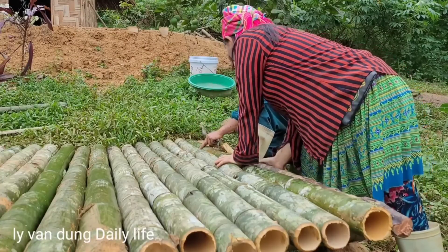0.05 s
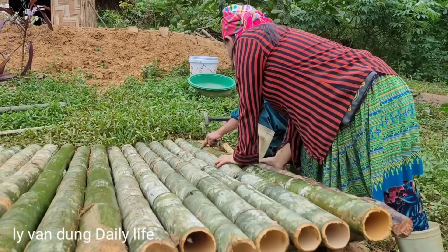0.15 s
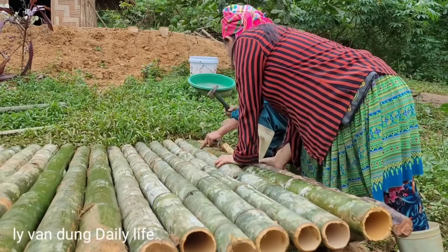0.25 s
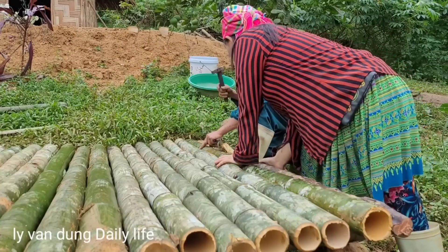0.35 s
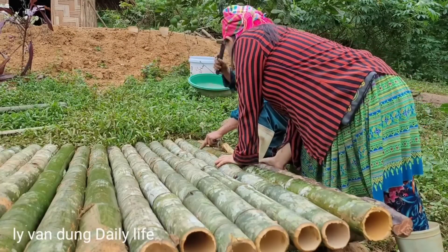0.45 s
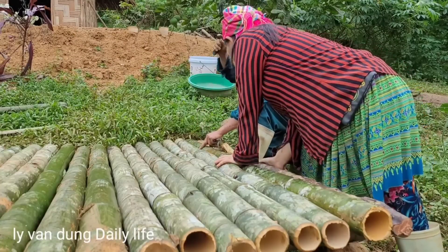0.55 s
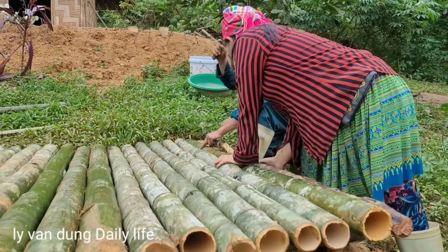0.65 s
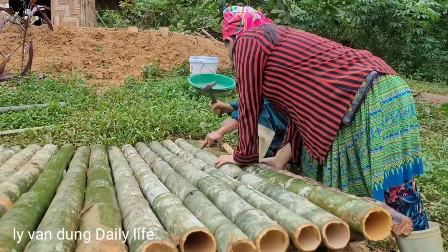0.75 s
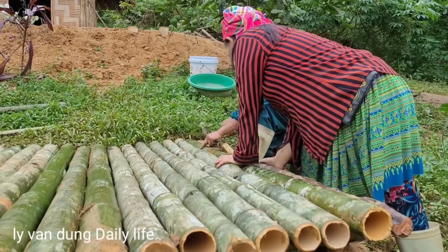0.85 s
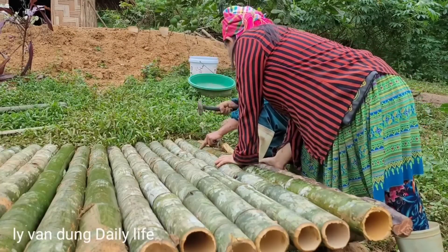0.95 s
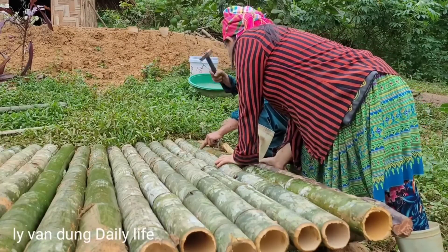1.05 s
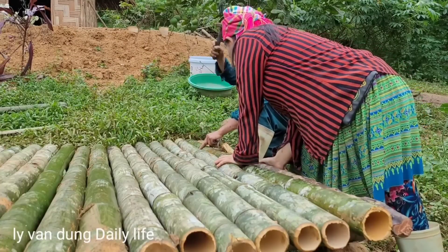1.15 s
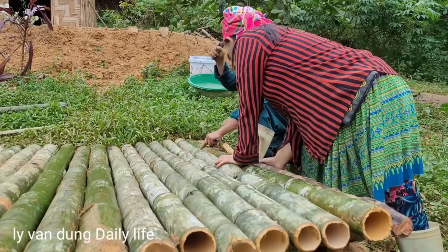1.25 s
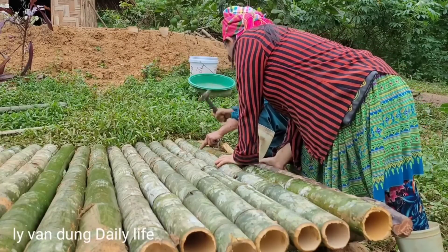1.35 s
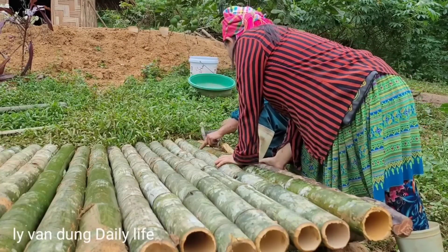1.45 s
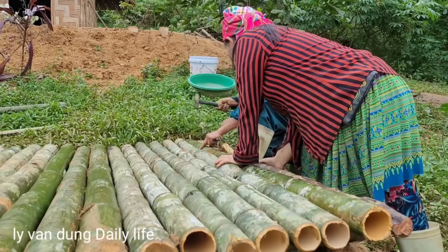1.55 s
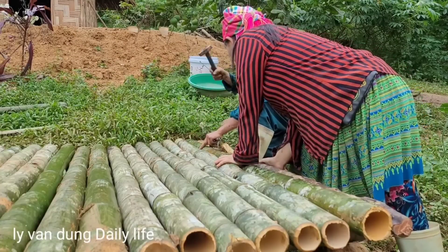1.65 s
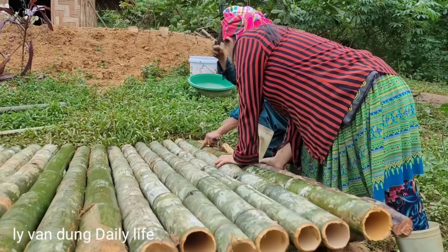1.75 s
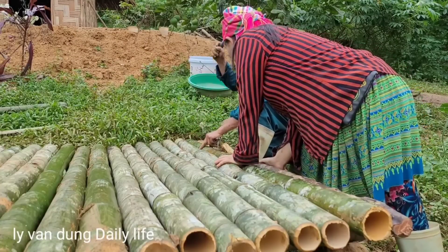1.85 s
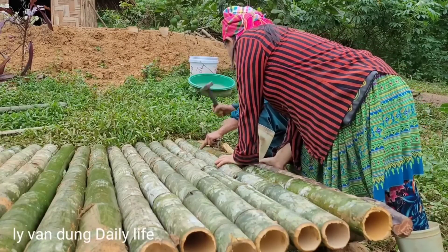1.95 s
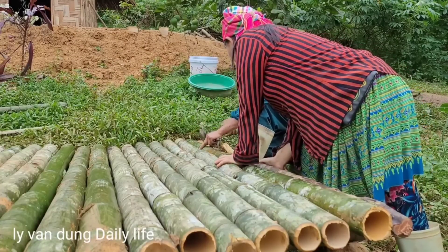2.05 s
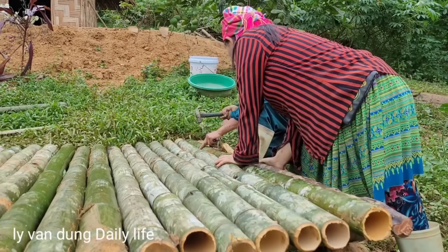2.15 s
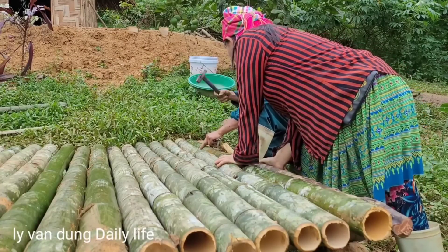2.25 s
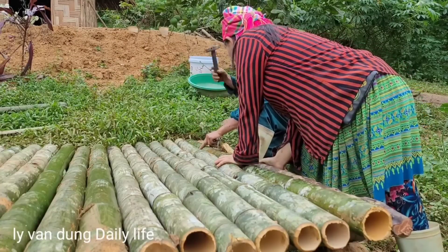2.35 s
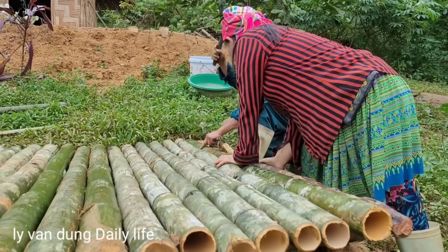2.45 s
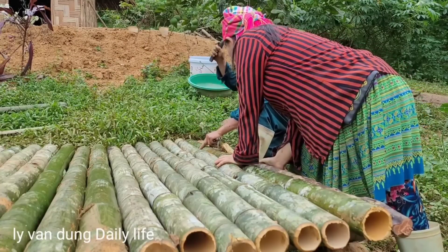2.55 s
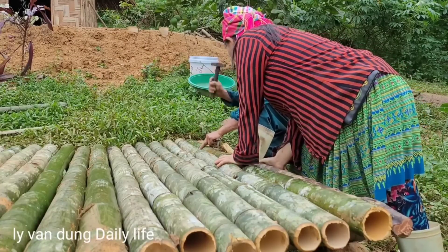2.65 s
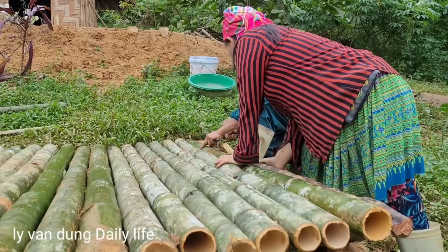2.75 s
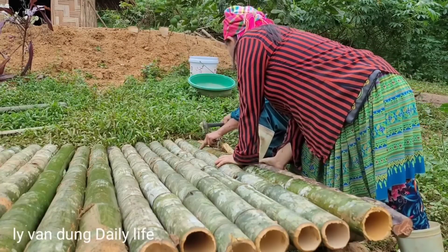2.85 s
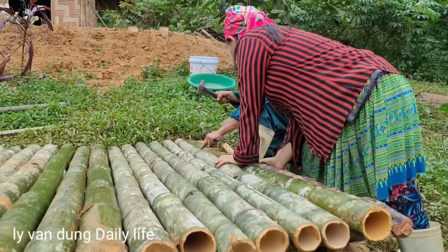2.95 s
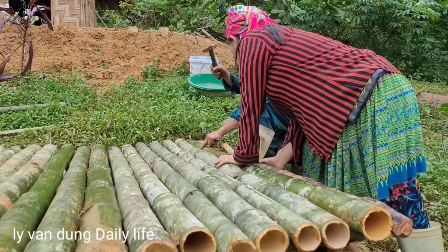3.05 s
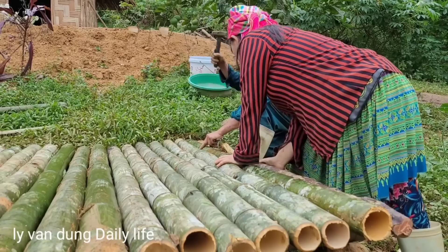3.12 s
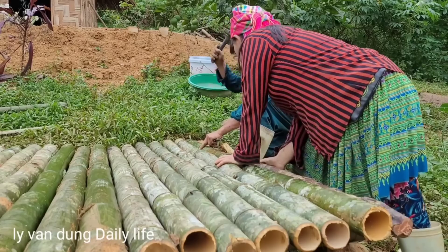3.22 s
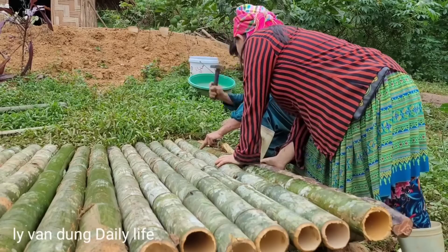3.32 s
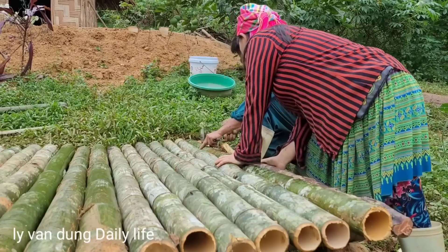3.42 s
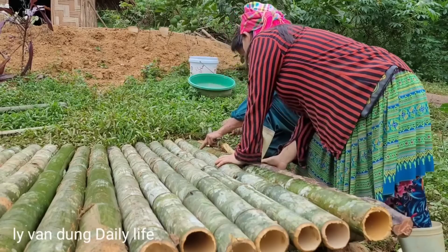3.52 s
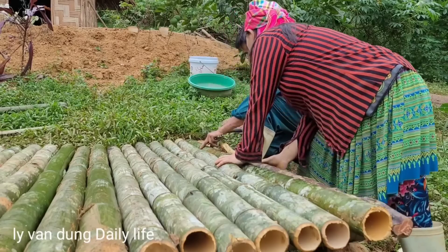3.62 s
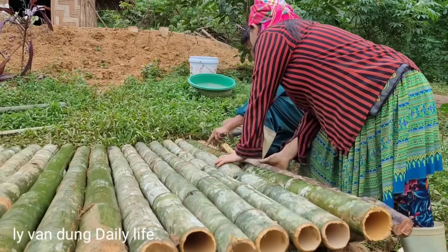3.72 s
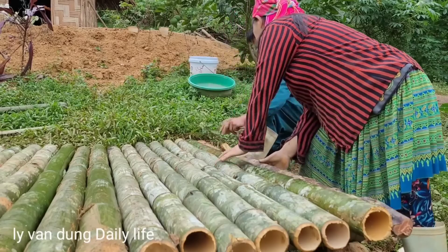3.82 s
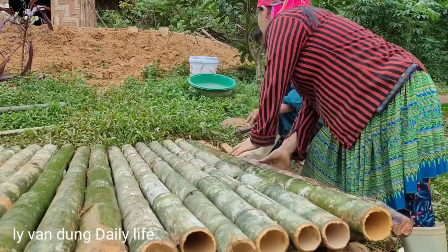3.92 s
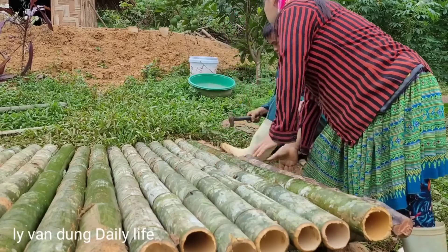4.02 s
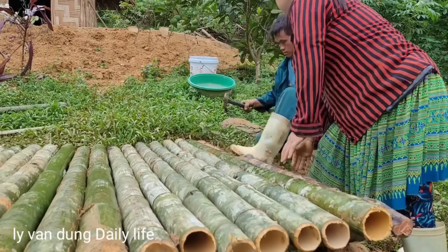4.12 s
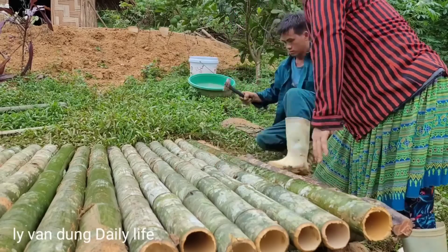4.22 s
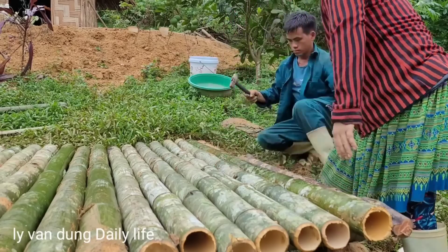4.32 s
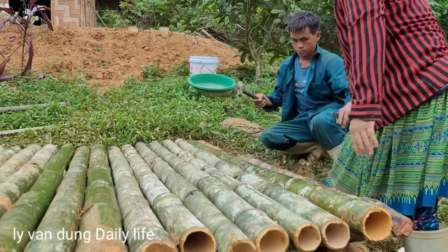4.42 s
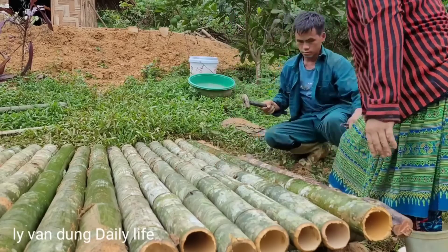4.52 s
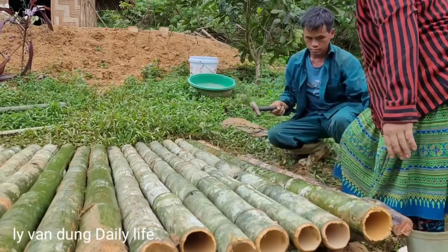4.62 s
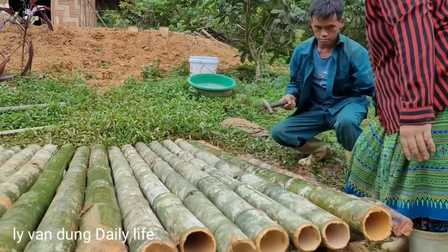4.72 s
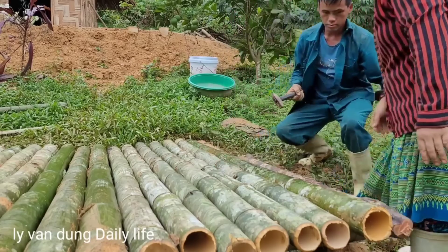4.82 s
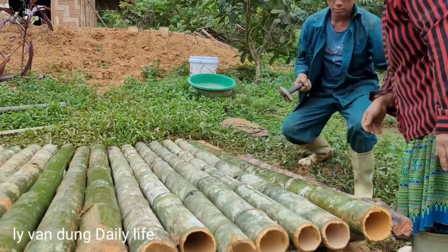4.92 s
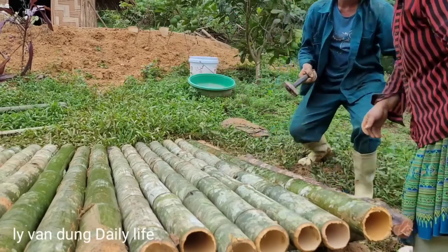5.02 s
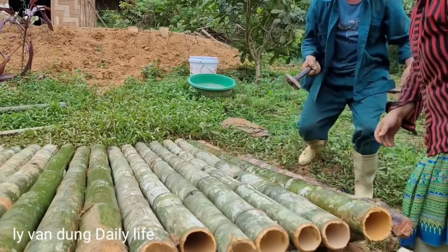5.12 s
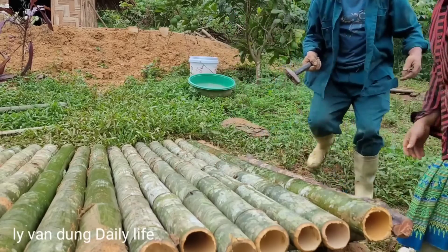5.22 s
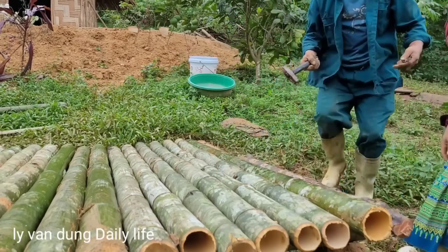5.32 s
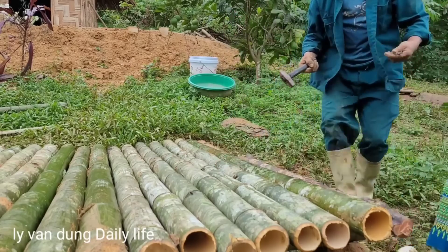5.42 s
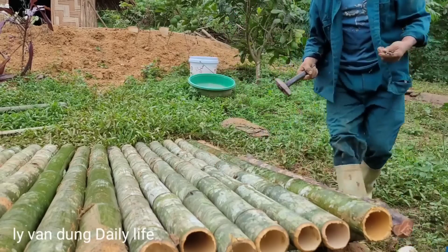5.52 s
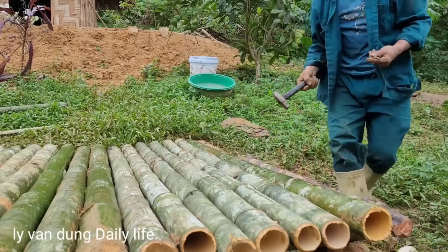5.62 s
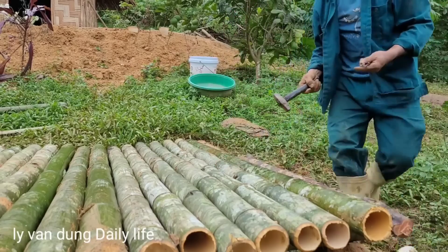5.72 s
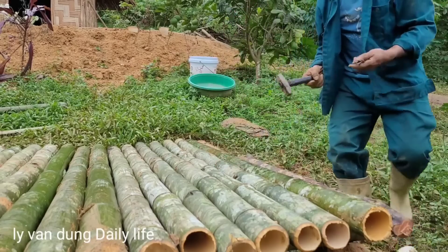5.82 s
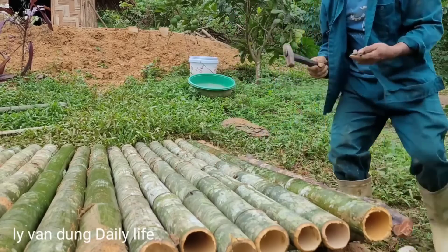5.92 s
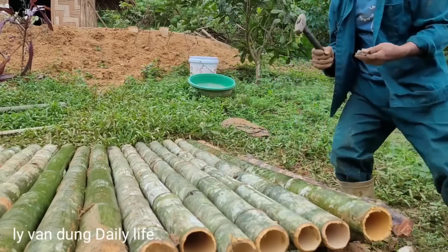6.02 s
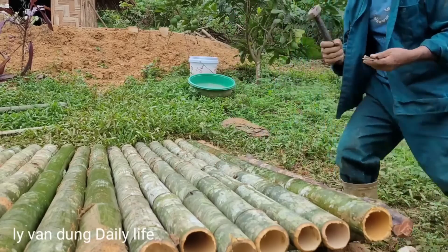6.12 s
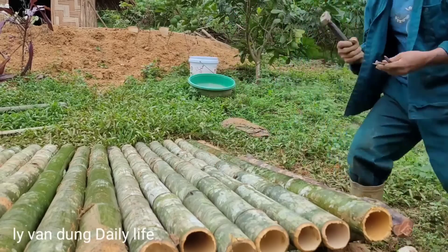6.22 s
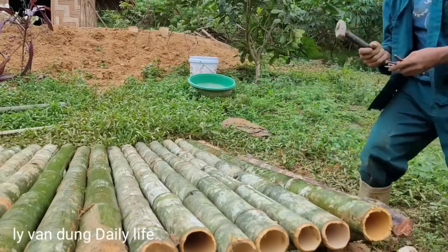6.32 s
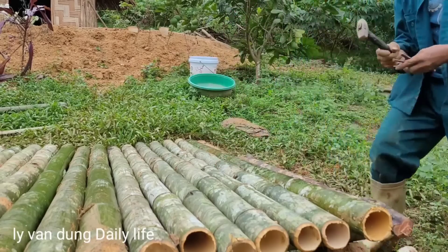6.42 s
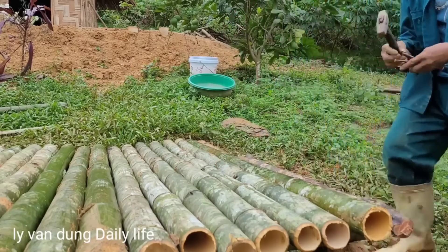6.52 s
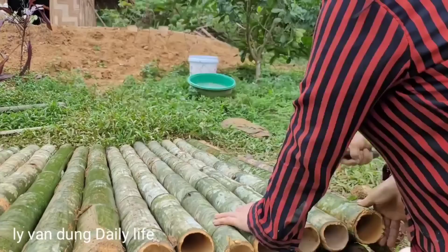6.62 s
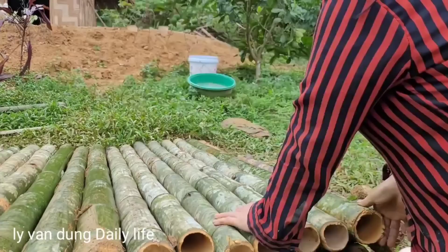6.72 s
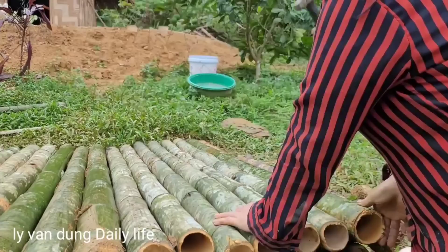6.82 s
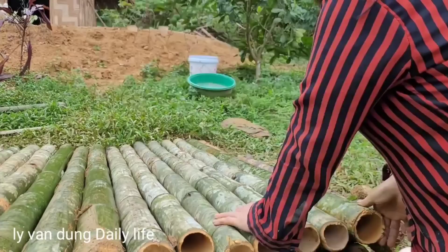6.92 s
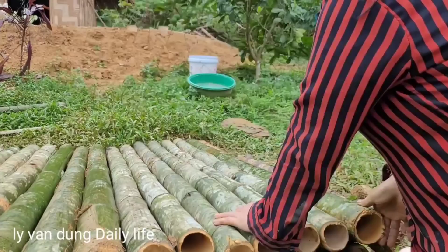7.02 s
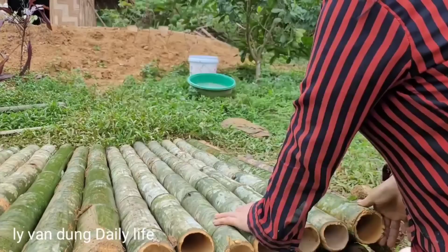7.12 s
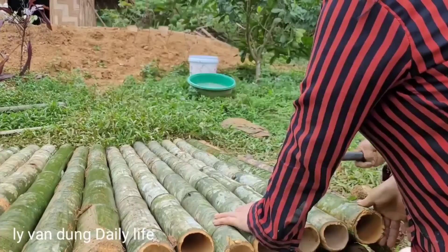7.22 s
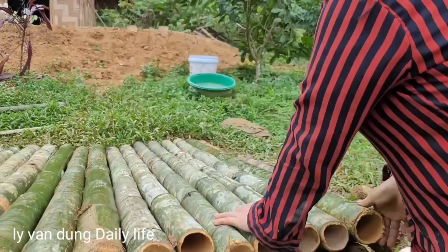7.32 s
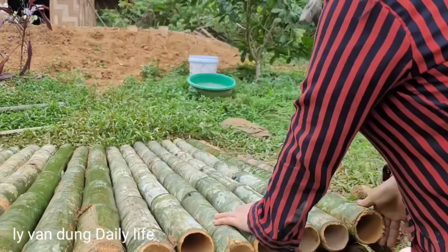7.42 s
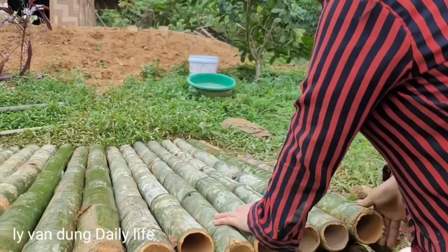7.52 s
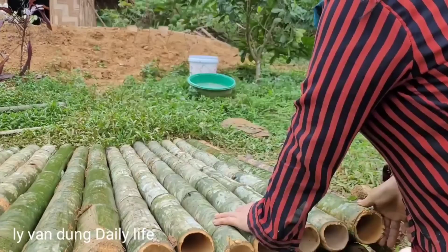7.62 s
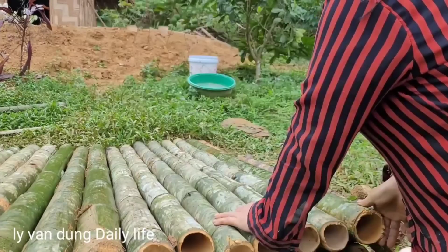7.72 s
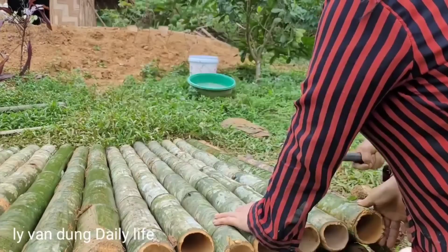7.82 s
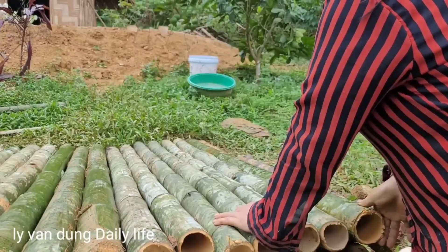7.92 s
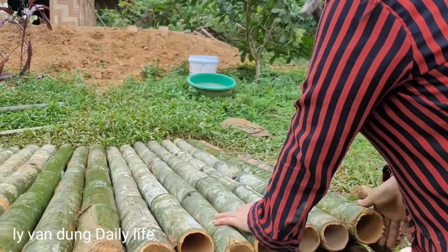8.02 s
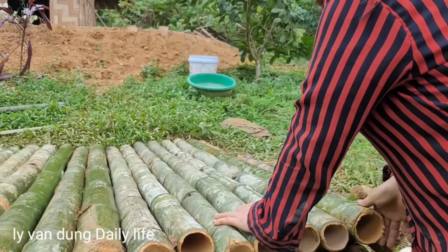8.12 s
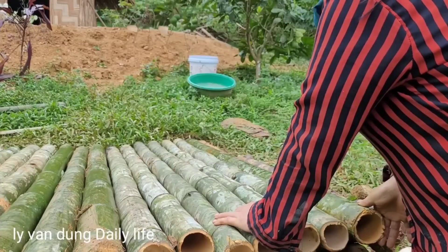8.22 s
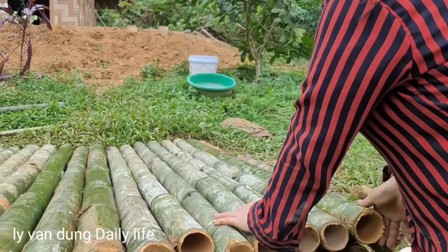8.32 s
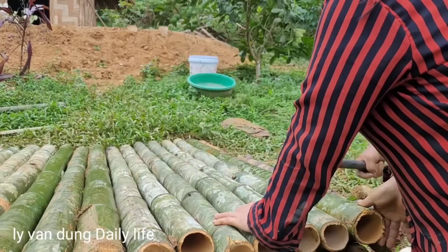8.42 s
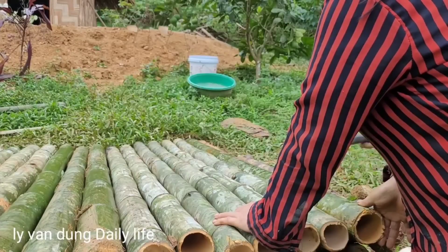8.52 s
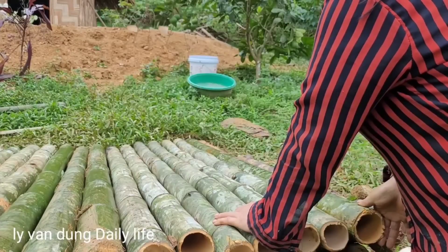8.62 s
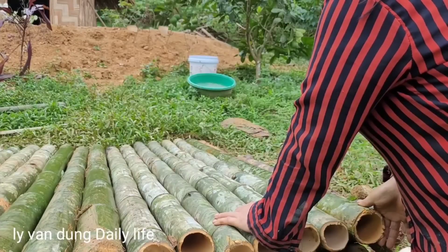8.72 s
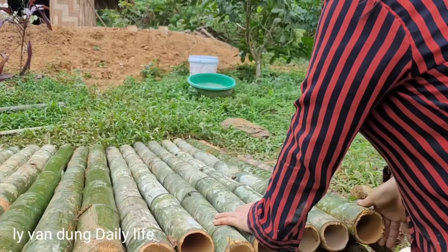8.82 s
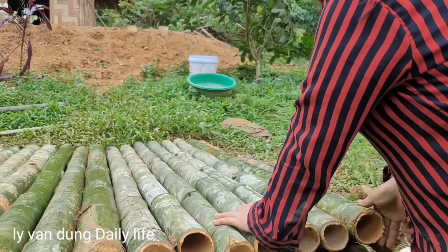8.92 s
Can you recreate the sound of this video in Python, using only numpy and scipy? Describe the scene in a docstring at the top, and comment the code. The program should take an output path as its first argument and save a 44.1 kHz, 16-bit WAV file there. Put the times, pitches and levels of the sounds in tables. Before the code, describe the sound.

In an open garden, a hard tool strikes green bamboo poles six times, a little over half a second apart, the first loudest and driest. Each crack has a short hollow knock and a soft echo from trees. Then boots pad faintly through weeds with snapping twigs, and four brighter, more splintery blows follow, the first of them weak. Light leaf hiss stays underneath. The microphone sits near the poles, in stereo.

```python
"""Leaves hiss for a moment, a swing swishes dully, then a blade cracks into green bamboo poles on a village garden's ground.
Six blows fall at the far end, boots walk through the weeds, then four brighter blows fall at the near end.
Each blow mixes noise bursts for the crack and splitting fibres with fading tones for the poles and the air in them.
A tail of fading noise echoes the blows off the trees. The first swing, boots, twigs and leaves are shaped noise.
A short sine tone is a distant bird."""
import sys
import numpy as np
from scipy import signal
from scipy.io import wavfile

SR = 44100
rng = np.random.default_rng(int(sys.argv[2]) if len(sys.argv) > 2 else 0)


def transcribe(u):
    """Save the signal u as a 16-bit wav file named by the first command-line argument.

    u: samples, shape (n,) or (channels, n), limited to [-1, 1]; the rate is SR.
    q: integer samples, one column per channel.
    """
    v = np.clip(np.atleast_2d(u).T, -1, 1)
    q = np.round(v * 32767).astype(np.int16)
    wavfile.write(sys.argv[1], SR, q)


N = 395136

# noise is shaped in 24 bands: their edges and middles in Hz
BAND_EDGES = np.geomspace(35, 17000, 25)
BAND_HZ = np.sqrt(BAND_EDGES[1:] * BAND_EDGES[:-1])
# seconds since a blow, starting just before it; BODY marks the part that sets its loudness
AGE = np.arange(int(.3 * SR)) / SR - .006
BODY = AGE < .056

# blows at each end: (time [s], strength [dB], extra woody knock [dB], extra splintering [dB],
# sharpness of the crack [dB], note of the struck spot [Hz], grip on the pole [0-1])
FAR_STRIKES = [(.2055, -15.5, -6, -9, 6.5, 4066, 1), (.924, -19, -4, .5, 1, 3195, 0.08),
               (1.514, -19.5, -3.5, .5, 2, 1402, 0.04), (2.1215, -21, -2.5, .5, 1, 1846, 0),
               (2.8545, -21.5, 1.5, -2, 1.5, 1146, 0.02), (3.526, -22.5, 1.5, -6, -2, 1200, 0.01)]
NEAR_STRIKES = [(6.6985, -34.5, 0.45, -3, -6, 2782, 0), (7.2895, -23, 0.66, -2.5, 2, 3250, 0.039),
                (7.8997, -26, 0.77, 1, -2, 7770, 0.004), (8.5132, -24.5, -1.04, 1, -1, 14100, 0)]
# tones of the poles struck at each end: (pitch [Hz], relative level [dB], time to fade by 60 dB [s])
FAR_POLE_TONES = [(67.4, -16, 0.16), (124.3, -17.5, .17), (220.3, -12, .17), (267.4, -1.5, 0.14),
                  (361, -1.5, 0.071), (406.7, -5.5, 0.15), (453, -11.5, 0.031), (526.5, -10.5, 0.19),
                  (591.7, -2.5, 0.12), (653, 0, 0.072), (704, -14.5, 0.18), (914, -10, 0.094),
                  (1057, -10.5, 0.091), (1160, -5, 0.04), (1348, -1.5, .085), (1531, -11.5, 0.12),
                  (1686, -10.5, 0.087), (1870, -12, 0.079), (1996, -15.5, 0.038), (2132, -15, 0.099),
                  (3274, -9.5, .075), (4060, -17.5, 0.041), (4940, -15.5, .09)]
NEAR_POLE_TONES = [(63, -15, 0.21), (145.7, -20, 0.21), (203, -21.5, 0.063), (273.5, -6.5, 0.19),
                   (323, -7.5, 0.038), (389.3, 1.5, 0.096), (422, -23, 0.064), (545, -5.5, 0.093),
                   (596.8, -4.5, 0.14), (657.7, -4.5, 0.1), (740, -3, 0.071), (948, -4.5, .08),
                   (1170, -6, 0.061), (1364, 4, 0.054), (1565, -3, 0.06), (1783, 0.5, 0.057),
                   (2340, -30, .1), (2800, -12.5, .08), (3044, -15.5, 0.2), (3380, -29, 0.064),
                   (4130, -40.5, .12), (4640, -25.5, 0.11)]
# balance of a blow, low to high: (thud [dB], knock [dB], clack [dB], bite [dB], splinter [dB])
FAR_MIX = (-1, -1.34, 0.03, -9.5, -9.5)
NEAR_MIX = (-0.5, -0.65, -2.05, -5, -1.5)
# a pole held down firmly stops sooner; these apply in full at grip 1
GRIP_DAMPING_DB_PER_S, GRIP_HUM_LOSS_DB, GRIP_ECHO_LOSS_DB = 198.5, 12.5, 11
USUAL_STRENGTH_DB = -23


def chopping(blows, modes, balance, pan_db, fibre_db, crack_db, crack_s, travel_s, note_db,
             hum_db, hum_follows, hum_tilt_db, echo_db, note_t60=0.053):
    """A run of blows at one end: poles and their air sound directly, and some sound travels to the trees."""
    direct, outgoing = np.zeros((2, 2, N))
    # the first piece of noise is dropped, as its filters are still settling
    grains = np.split(noise_bands((len(blows) + 1) * len(AGE)), len(blows) + 1, axis=2)[1:]
    for grain, strike in zip(grains, blows):
        s, strength_db, knock_db, splinter_db, sharp_db, note_hz, grip = strike
        levels_db = strength_db + np.array(balance) + [0, knock_db, knock_db, 0, splinter_db]
        ringing = list(modes) + [(note_hz, note_db, note_t60)]
        knock = blow(levels_db, ringing, grain, fibre_db, crack_db + sharp_db, crack_s, travel_s)
        knock = knock * from_db(-grip * GRIP_DAMPING_DB_PER_S * np.maximum(AGE - travel_s, 0))
        # hum_follows sets how much a stronger blow raises the hum
        air_db = hum_db + hum_follows * (strength_db - USUAL_STRENGTH_DB) - grip * GRIP_HUM_LOSS_DB
        add(direct, knock, s)
        add(direct, from_db(air_db) * hollows(hum_tilt_db), s)
        add(outgoing, from_db(echo_db - grip * GRIP_ECHO_LOSS_DB) * knock, s)
    panned = direct * from_db([[pan_db / 2], [-pan_db / 2]])
    return np.array([panned, outgoing])


# borders between thud, knock, clack, bite and splinter: (frequency [Hz])
REGISTER_BORDERS = [480, 1000, 2200, 6000]
# the crowd of small fibre and wall tones:
# (frequency [Hz], relative level per Hz [dB], time to fade by 60 dB [s])
FIBRE_CROWD = [(50, -7.5, 0.096), (104, -10.5, .2), (333.5, 4, 0.16), (610, 0, .13), (850, -10, 0.08),
               (1290.5, -3, 0.098), (1768.6, -6.5, 0.12), (2380, -18, 0.19), (3080, -10.5, 0.15),
               (7650, -17.5, 0.16), (10000, -14.5, 0.13), (15500, -17.5, 0.17)]
# the first crack of the blade: (frequency [Hz], relative level per Hz [dB])
CRACK_COLOUR = [(100, -24.5), (500, -6), (1200, 3.5), (2400, -9), (4000, -3), (7500, -1), (15500, -14)]


def blow(levels_db, modes, grain, fibre_db, crack_db, crack_s, travel_s,
         crush_db=-10.5, crush_s=0.00075, tear_s=0.0013):
    """One blow sets off a brief crack, ringing pole tones and rattling fibres, leveled in five pitch ranges."""
    registers = np.zeros((len(levels_db), 2, len(AGE)))
    for hz, db, t60 in modes:
        # the blade lands on a slightly different spot each time
        pitch = hz * (1 + 0.0039 * rng.standard_normal())
        # the less alike left and right are, the more their phases differ
        spread = np.sqrt(1 - at_hz(SIDE_LIKENESS, hz))
        phase = 2 * np.pi * rng.random() + spread * rng.standard_normal((2, 1))
        ring = np.sin(2 * np.pi * pitch * AGE + phase) * swell(hz, t60, travel_s)
        tone_gain = from_db(db + rng.normal(0, 1.3))
        registers[np.searchsorted(REGISTER_BORDERS, hz)] += tone_gain * ring
    # fibres crush for an instant before the wall gives way, then tear
    crush = from_db(crush_db) * np.exp(np.minimum(AGE / crush_s, -AGE / tear_s))
    fibre_gains = from_db(fibre_db) * band_gains(FIBRE_CROWD)
    crack_gains = from_db(crack_db) * band_gains(CRACK_COLOUR)
    for hz, band, fibre_gain, crack_gain in zip(BAND_HZ, grain, fibre_gains, crack_gains):
        # crack_s is the width at 4000 Hz; lower bands last longer
        snap = np.exp(-(AGE / (crack_s * (hz / 4000) ** -.35)) ** 2) + crush
        centred = band + 0.23 * (band[::-1] - band) / 2   # the crack comes straight to both ears
        rattle = band * fibre_gain * swell(hz, at_hz(FIBRE_CROWD, hz, axis=2), travel_s)
        crack = centred * crack_gain * snap
        registers[np.searchsorted(REGISTER_BORDERS, hz)] += rattle + crack
    return sum(from_db(db) * part / rms(part[:, BODY]) for db, part in zip(levels_db, registers))


def swell(hz, t60, travel_s):
    """Bending waves are slower the lower they are, so the lows build up late before they die away."""
    arrival = travel_s * (hz / 300) ** -.6   # travel_s is the delay at 300 Hz
    rise = 1 - np.exp(-(np.maximum(AGE, 0) / arrival) ** 2)
    return rise * from_db(-60 * np.maximum(AGE - arrival, 0) / t60)


# air inside the hollow poles: (pitch [Hz], level before tilt [dB], time to fade by 60 dB [s])
AIR_TONES = [(142, -7.5, 0.72), (159, -8, 0.41), (178, -4, .4), (209.7, 1.5, .45), (234, -5.5, 0.3),
             (244, 2, 0.45), (266, -4, 0.2)]


def hollows(tilt_db, rise_s=0.02):
    """The air inside the poles hums on after the walls are still; neighbouring poles beat. Tilt is per octave."""
    t = np.arange(SR) / SR
    hum = 0
    for hz, db, t60 in AIR_TONES:
        tilted_db = db + tilt_db * np.log2(hz / AIR_TONES[0][0])
        fading = from_db(tilted_db - 60 * t / t60)
        hum = hum + fading * np.sin(2 * np.pi * (hz * t + rng.random()))
    return np.ones((2, 1)) * hum * (1 - np.exp(-(t / rise_s) ** 2))


# sound scattered back by bank and trees:
# (frequency [Hz], relative level [dB], time to fade by 60 dB [s])
TREE_SCATTER = [(49.82, -43, 0.43), (200, -31.5, 0.97), (400, -44.5, 0.93), (700, -41, 0.72),
                (1000, -46, 0.97), (1690, -36, 1.0), (2500, -30, 0.99), (4500, -25.5, 0.62), (8000, -31, 1),
                (15500, -27.5, 0.32)]


def scatter(sound, echo_s=0.1624, echo_width_s=0.034, echo_share=1.2, hills_db=-51.0, hills_t60=3.4):
    """An uneven diffuse tail with one soft echo from the tree line, and a long faint ring from the hills."""
    t = np.arange(2 * SR) / SR
    tree_line = 1 + echo_share * np.exp(-((t - echo_s) / echo_width_s) ** 2)
    echo = np.clip(t / 0.038, 0, 1) * tree_line
    hills_shape = from_db(hills_db - 60 * t / hills_t60) * np.clip(t / 0.23, 0, 1)
    response = 0
    for hz, width, band in zip(BAND_HZ, np.diff(BAND_EDGES), noise_bands(len(t))):
        fading = from_db(at_hz(TREE_SCATTER, hz) - 60 * t / at_hz(TREE_SCATTER, hz, axis=2))
        trees = fading * echo * lumps(len(t), per_s=43, depth_db=3.0)
        hills = hills_shape * (550 < hz < 2000)   # the hills answer only in the middle pitches
        # wider bands carry more noise
        response = response + band * (trees + hills) * np.sqrt(2 * width / SR / BODY.sum())
    return signal.fftconvolve(sound, response, axes=1)[:, :N]


# soft low thumps: a dull swish of the swing just before the first blow, then boots on earth:
# (time [s], level [dB], pitch [Hz], length [s])
SOFT_THUMPS = [(0.179, -54, 294, 0.027), (4.569, -66.5, 470, 0.011), (5.074, -66.5, 245, 0.012),
               (5.641, -62, 190, 0.023), (5.761, -69.5, 1170, 0.0086), (6.085, -72, 373, 0.052)]
# the loudest twigs snapping: (time [s], level [dB])
TWIG_SNAPS = [(1.985, -57), (2.402, -52.5), (3.411, -60), (4.133, -61.5), (4.808, -58), (5.358, -52),
              (5.531, -48.5), (5.883, -62), (6.147, -52), (6.593, -46.5), (8.393, -55)]


def thumps_and_twigs():
    """Soft low noise pats, first for a swing, then for boots on earth; twigs snap as tiny bright bursts."""
    out = np.zeros((2, N))
    for s, db, hz, length in SOFT_THUMPS:
        dull = signal.butter(3, [hz / 1.6, hz * 1.6], "band", fs=SR, output="sos")
        pat = signal.sosfilt(dull, rng.standard_normal(len(AGE)))
        rise_and_fall = np.exp(-((AGE - AGE.mean()) / length) ** 2 / 2)
        thump = np.ones((2, 1)) * from_db(db) * pat / rms(pat) * rise_and_fall
        add(out, thump, max(s - AGE.mean(), -AGE[0]))   # centred on s, never before the start
    bright = signal.butter(1, [2800, 9000], "band", fs=SR, output="sos")
    for s, db in TWIG_SNAPS:
        tick = signal.sosfilt(bright, rng.standard_normal((2, len(AGE))))
        decay = (AGE > 0) * np.exp(-abs(AGE) / 0.0027)
        add(out, from_db(db) * tick / rms(tick) * decay, s)
    return out


# stirring of the leaves, before the leaf gain: (time [s], level [dB])
LEAF_STIRRING = [(0.0, -66), (0.65, -69.5), (0.92, -69.5), (3.84, -71), (4.49, -74), (5.34, -64.5),
                 (6.84, -66.5), (7.04, -70.5), (8.71, -69), (8.96, -71)]
USUAL_RUSTLE_DB = -66
# colour of the leaf hiss: (frequency [Hz], relative level per Hz [dB])
LEAF_COLOUR = [(1180, -40), (2000, -14.5), (3580, 1), (5990, -9), (6820, -4.5), (8780, -9.5), (11900, -5.5),
               (13600, -7), (14900, -6), (16000, -9.5)]


def garden(wash_power, leaf_gain_db=1.8, brush_db=-77.0, brush_follows=1.3, brush_tilt_db=-1.5,
           flicker_db=3.0, ticks_per_s=26, tick_db=4.0):
    """Leaves hiss, tick and brush unevenly as they stir; the wash of the blows hangs behind them."""
    t, noise = np.arange(N) / SR, noise_bands(N)
    rustle_db = np.interp(t, *np.transpose(LEAF_STIRRING))
    leaves, brushing = 0, 0
    for hz, leaf, brush, band in zip(BAND_HZ, band_gains(LEAF_COLOUR), band_gains(WASH_COLOUR), noise):
        leaves = leaves + leaf * band * lumps(N, per_s=61, depth_db=flicker_db)
        tilt = from_db(brush_tilt_db * np.log2(hz / 500))   # per octave
        backwards = band[:, ::-1]   # played backwards, so it differs from the hiss
        brushing = brushing + brush * tilt * backwards * lumps(N, per_s=19, depth_db=2.5)
    # random touches, each fading within milliseconds, briefly raise the hiss
    touches = (rng.random(N) < ticks_per_s / SR) * rng.random(N)
    tick_fade = np.exp(-1 / (0.0025 * SR))
    ticks = from_db(tick_db) * signal.lfilter([1], [1, -tick_fade], touches + 1e-18)
    hiss = leaves * (1 + ticks) * from_db(rustle_db + leaf_gain_db)
    brush_level_db = brush_db + brush_follows * (rustle_db - USUAL_RUSTLE_DB)
    brushing = brushing * lumps(N, per_s=8, depth_db=1.35) * from_db(brush_level_db)
    return hiss + brushing + wash(noise) * np.sqrt(wash_power)


# colour of the wash, also used for the brushing leaves: (frequency [Hz], relative level per Hz [dB])
WASH_COLOUR = [(40, 0), (150, -5.5), (300, -3.5), (450, 0.5), (650, -2.5), (850, -1), (1500, -2),
               (2000, -7), (2600, -20.5), (15000, -50)]
# the wash rings at a few woody pitches: (pitch [Hz], width [Hz], relative level [dB])
WASH_PITCHES = [(650, 77, -5.5), (1168, 66, -9), (1400, 60, -7.5), (1590, 71, -5.5)]


def wash(noise, peaks_db=-7.5, broad_db=-1.5, low_cut_hz=270.0, waver_db=2.5):
    """Dull distant noise with narrow woody resonances swelling out of it."""
    low_cut = signal.butter(1, low_cut_hz, "high", fs=SR, output="sos")
    broad = np.tensordot(band_gains(WASH_COLOUR), noise, 1)
    out = from_db(broad_db) * signal.sosfilt(low_cut, broad)
    for hz, width, db in WASH_PITCHES:
        b, a = signal.iirpeak(hz, hz / width, fs=SR)
        band = noise[np.searchsorted(BAND_EDGES, hz) - 1]
        peak = signal.lfilter(b, a, signal.lfilter(b, a, band))   # filtered twice, so it is narrower
        out = out + from_db(db + peaks_db) * peak / rms(peak) * lumps(N, per_s=5.5, depth_db=waver_db)
    return out


# the dull wash that lingers after a blow
WASH_RISE_S, WASH_HOLD_S, WASH_FALL_DB_PER_S = .12, 0.48, 41


def lingering(blows, level_db):
    """Power of the wash after a run of blows: it rises, holds and falls, louder after a woodier knock."""
    t, power = np.arange(N) / SR, 0
    for s, _, knock_db, *_ in blows:
        fall_db = WASH_FALL_DB_PER_S * np.maximum(t - s - WASH_HOLD_S, 0)
        rise = np.clip((t - s) / WASH_RISE_S, 0, 1)
        power = power + (rise * from_db(level_db + knock_db - fall_db)) ** 2
    return power


def bird(level_db=-64.5, time_s=.87, pitch_hz=4400, length_s=.03):
    """One short, slightly falling whistle far away: a sine tone that swells and fades."""
    t = np.arange(N) / SR - time_s
    whistle = np.sin(2 * np.pi * pitch_hz * t * (1 - t / 2))
    return from_db(level_db) * np.exp(-(t / length_s) ** 2) * whistle


# how alike left and right are: (frequency [Hz], likeness [0 unrelated - 1 the same])
SIDE_LIKENESS = [(60, 0.57), (300, .9), (600, 0.96), (1200, 0.023), (2200, 0), (5000, 0.082), (12000, 0)]


def noise_bands(size):
    """Stereo noise in bands, each of rms 1, mostly alike in the bass and nearly unrelated in the treble."""
    bands = []
    for low, high, hz in zip(BAND_EDGES, BAND_EDGES[1:], BAND_HZ):
        sos = signal.butter(2, [low, high], "band", fs=SR, output="sos")
        mid, side = signal.sosfilt(sos, rng.standard_normal((2, size)))
        alike = at_hz(SIDE_LIKENESS, hz)
        pair = np.sqrt(1 + alike) * mid + np.sqrt(1 - alike) * side * [[1], [-1]]
        bands.append(pair / rms(pair))
    return np.array(bands)


def band_gains(spectrum):
    """Gain of each band for a spectrum per Hz; total power 1."""
    gains = from_db(at_hz(spectrum, BAND_HZ)) * np.sqrt(BAND_HZ)   # bands widen with frequency
    return gains / np.linalg.norm(gains)


def lumps(size, per_s, depth_db):
    """A gain that wanders at random, between per_s new values each second."""
    knots = rng.standard_normal(size // 20)
    wander = np.interp(np.arange(size) / SR * per_s, np.arange(len(knots)), knots)
    return from_db(depth_db * wander)


def at_hz(points, hz, axis=1):
    """Read one column of a table on a log-frequency axis."""
    table = np.array(points)
    return np.interp(np.log(hz), np.log(table[:, 0]), table[:, axis])


def add(out, sound, s):
    """Mix in a stereo sound whose age zero falls at time s."""
    start = round((s + AGE[0]) * SR)
    out[:, start:start + sound.shape[1]] += sound[:, :N - start]


def from_db(db):
    """Decibels to gain."""
    return 10 ** (np.asarray(db) / 20)


def rms(x):
    """Root mean square: the average strength of a sound."""
    return np.sqrt(np.mean(x ** 2) + 1e-20)


def scene():
    """Both runs of blows, the walk between them and the garden."""
    far = chopping(FAR_STRIKES, FAR_POLE_TONES, FAR_MIX, pan_db=1.0, fibre_db=0.5, crack_db=8.0,
                   crack_s=0.00034, travel_s=0.0093, note_db=-2.5,
                   hum_db=-38.5, hum_follows=1.0, hum_tilt_db=3.5, echo_db=1.27)
    near = chopping(NEAR_STRIKES, NEAR_POLE_TONES, NEAR_MIX, pan_db=0.9, fibre_db=3.0, crack_db=8.5,
                    crack_s=0.00051, travel_s=0.012, note_db=-2.5,
                    hum_db=-37.0, hum_follows=.1, hum_tilt_db=-8.0, echo_db=1.6)
    direct, outgoing = from_db(1.01) * (far + near)
    wash_power = lingering(FAR_STRIKES, level_db=-69.5) + lingering(NEAR_STRIKES, level_db=-81.5)
    return direct + scatter(outgoing) + thumps_and_twigs() + garden(wash_power) + bird()


def record(dry):
    """The highest peaks are rounded and the top is cut."""
    rounded = 1.3 * np.tanh(dry / 1.3)
    top_cut = signal.ellip(10, .1, 80, 15800, fs=SR, output="sos")   # cut above 15800 Hz
    return signal.sosfilt(top_cut, rounded)


dry = scene()
out = record(dry)
transcribe(out)
```